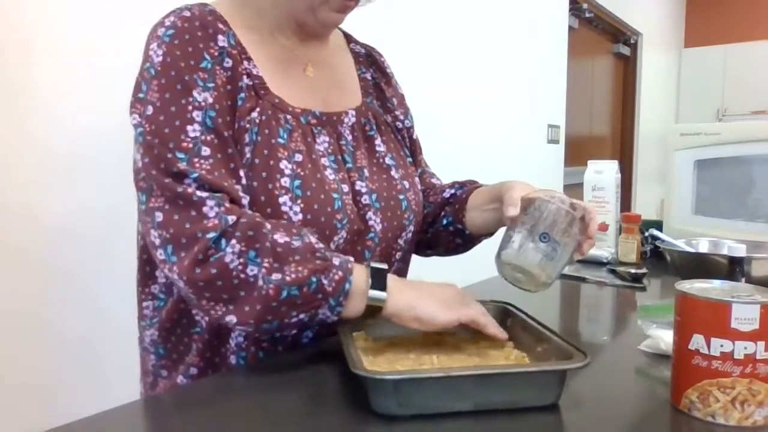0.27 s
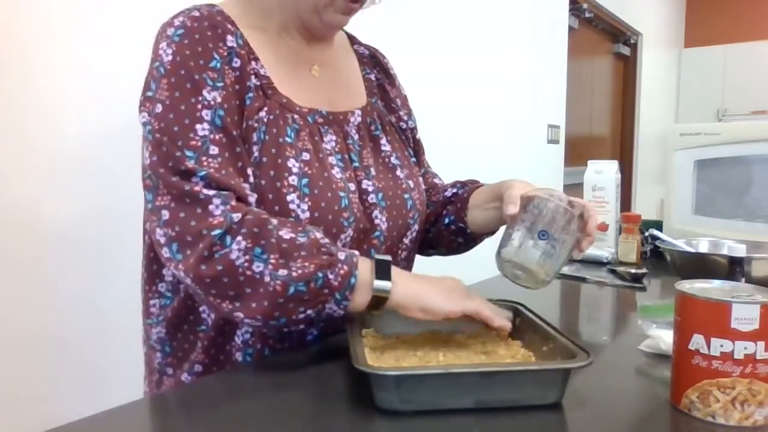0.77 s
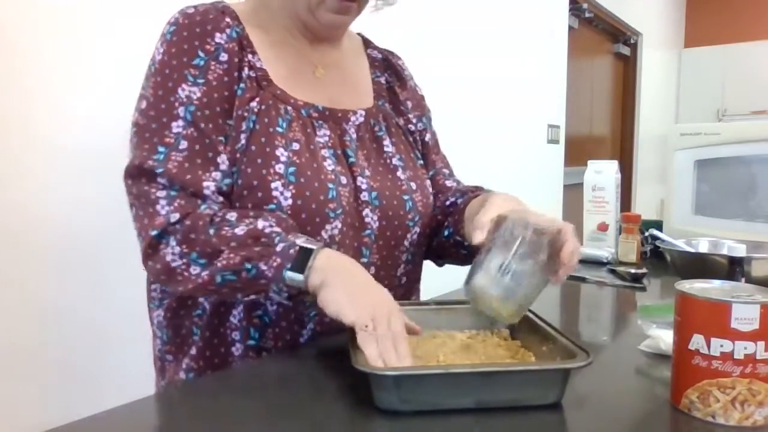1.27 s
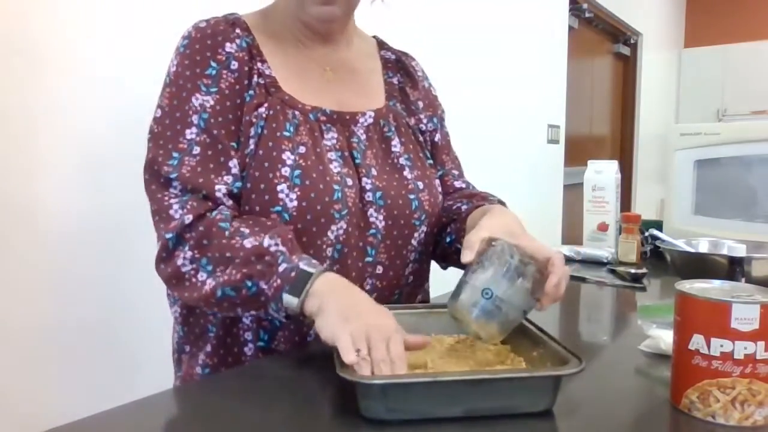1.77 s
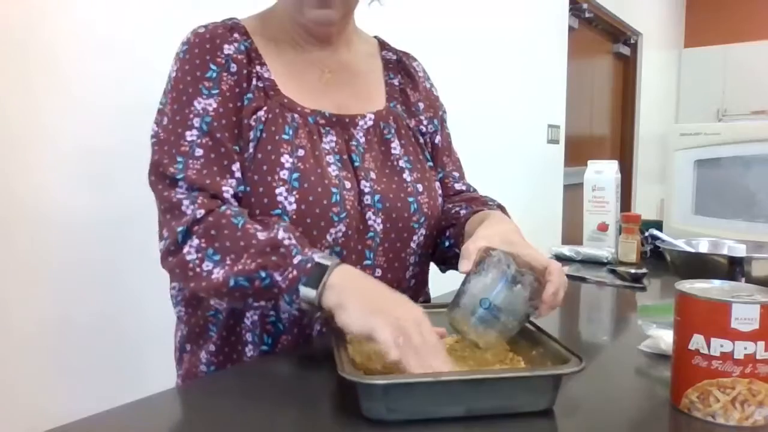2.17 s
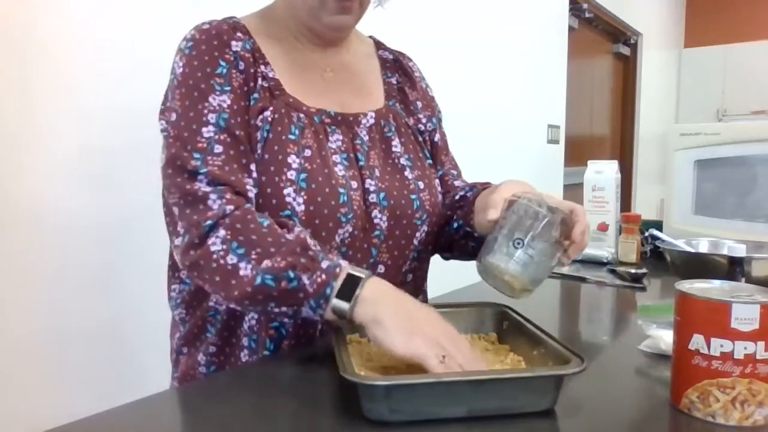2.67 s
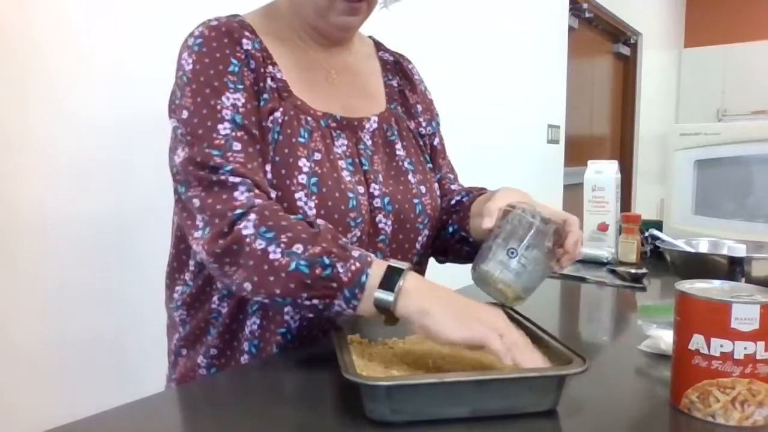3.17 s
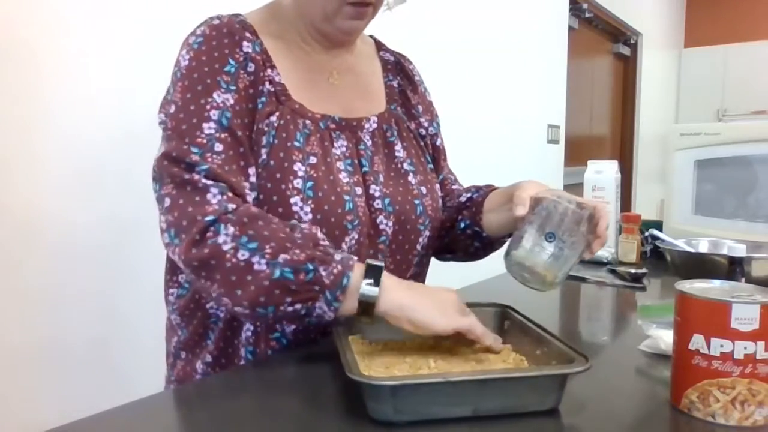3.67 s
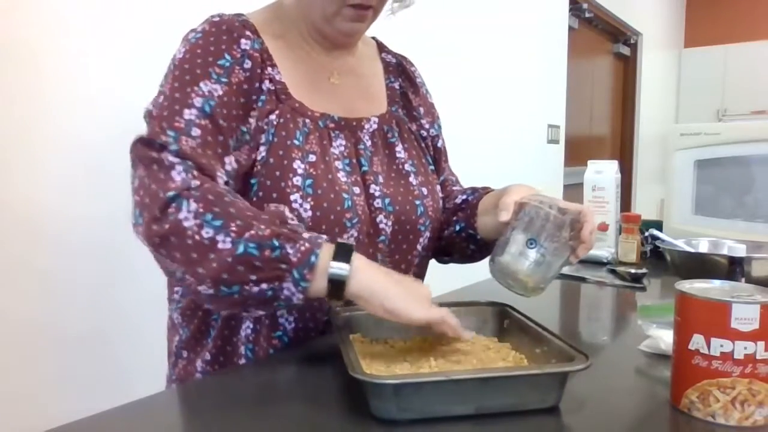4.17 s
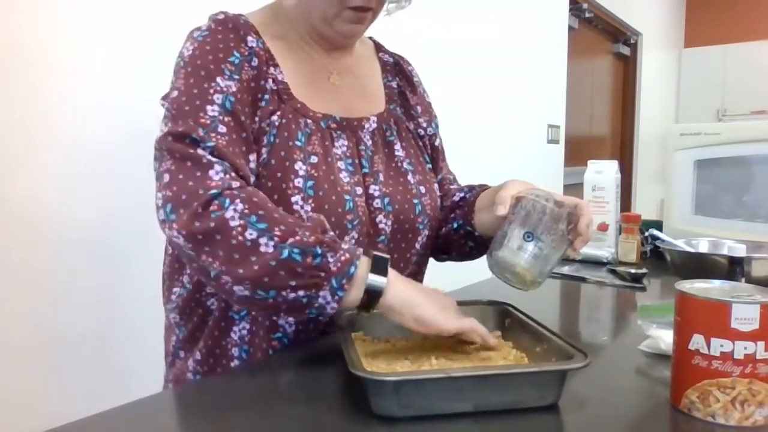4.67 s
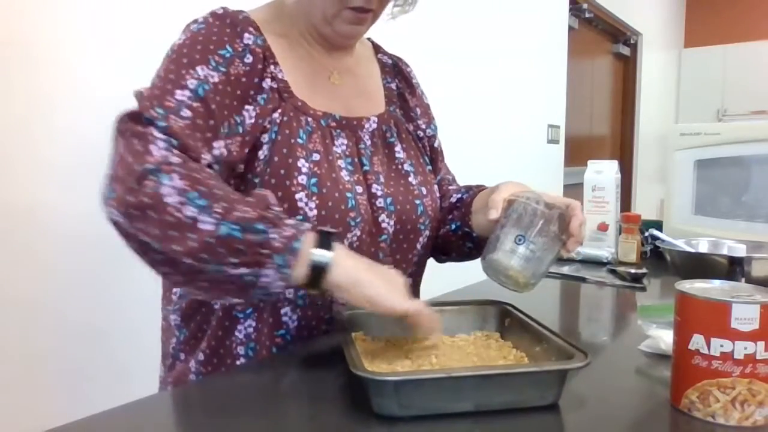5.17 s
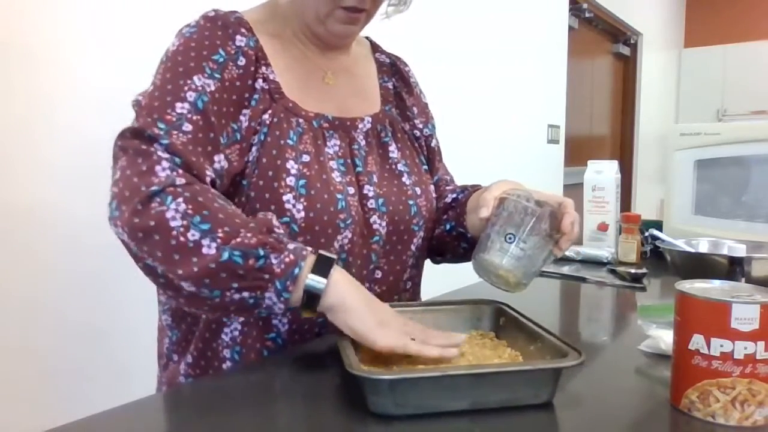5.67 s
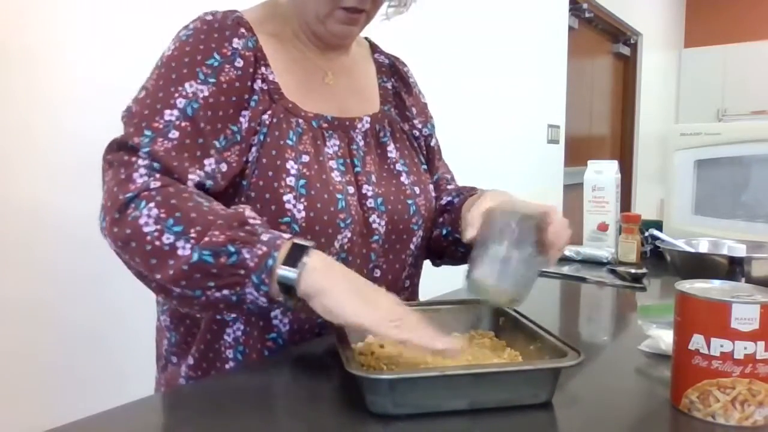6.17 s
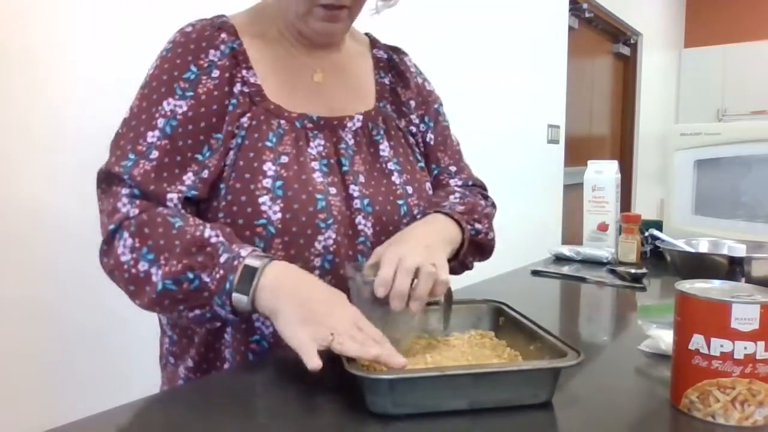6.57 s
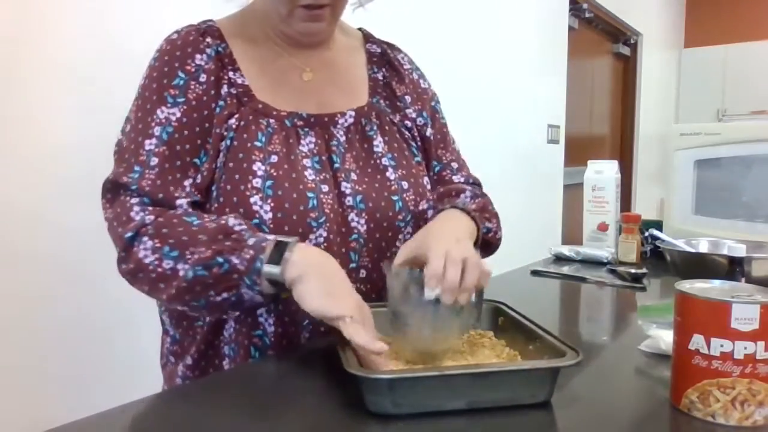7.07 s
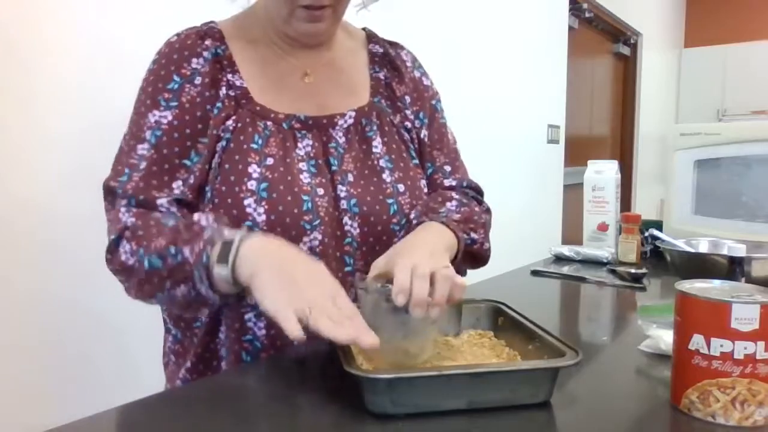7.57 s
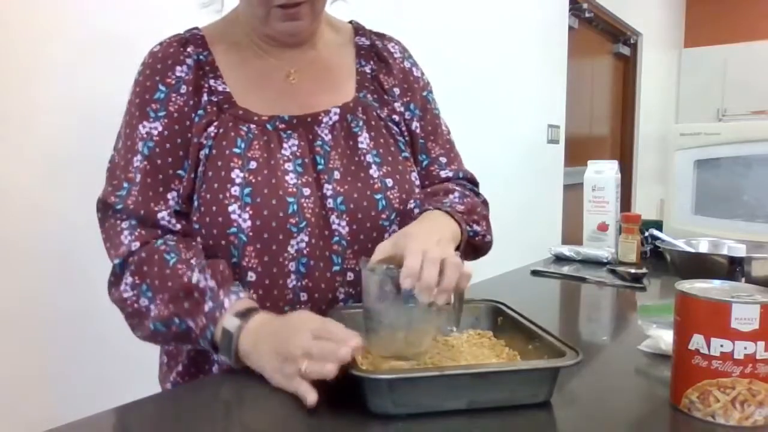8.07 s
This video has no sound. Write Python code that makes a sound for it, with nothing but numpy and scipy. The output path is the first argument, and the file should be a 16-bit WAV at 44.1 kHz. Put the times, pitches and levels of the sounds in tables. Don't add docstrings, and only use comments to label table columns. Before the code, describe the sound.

A hand pats and smooths crumbs in a metal baking pan, with soft crunchy rustles, one hard rim knock and small taps.

```python
import sys
import numpy as np
from scipy import signal
from scipy.io import wavfile
from scipy.ndimage import uniform_filter1d

SR = 44100
rng = np.random.default_rng(int(sys.argv[2]) if len(sys.argv) > 2 else 0)


def natural_amplitude(level_db):
    exponent = np.asarray(level_db, float) / 20
    return 10 ** exponent


def transcribe(signal):
    frames = np.atleast_2d(signal).T
    limited = np.clip(frames, -1, 1)
    pcm = np.round(limited * 32767).astype(np.int16)
    wavfile.write(sys.argv[1], SR, pcm)


N = 366603


def rms_one(x):
    return x / np.sqrt(np.mean(x ** 2) + 1e-20)


def at_hz(points, hz):
    table_hz, values = np.array(points).T
    return np.interp(np.log(hz), np.log(table_hz), values)


def drift(rate):
    pole = np.exp(-80 * np.pi * rate / SR)
    noise = rng.standard_normal(N // 40 + 2002)
    slow = signal.lfilter([1], [1, -2 * pole, pole * pole], noise)[2000:]
    return np.interp(np.arange(N) / 40, np.arange(len(slow)), rms_one(slow))


def ring(clicks, hz, t60):
    decay = natural_amplitude(-60 / (t60 * SR))
    turn = 2 * np.pi * hz / SR
    return signal.lfilter([0, np.sin(turn)], [1, -2 * decay * np.cos(turn), decay * decay], clicks + 1e-18)


def resonate(jolts, modes):
    total = 0
    for k, (hz, width_hz, db) in enumerate(modes):
        t60 = np.log(1000) / np.pi / width_hz
        total = total + (-1) ** k * natural_amplitude(db) * rms_one(ring(jolts, hz, t60))
    return rms_one(total)


def grains(per_s, spread_db):
    sizes = natural_amplitude(spread_db * np.minimum(rng.exponential(1, N), 4)) * rng.choice([-1, 1], N)
    return rms_one(sizes * (rng.random(N) < per_s / SR))


def banded(sources, spectrum, likeness, low_hz, patchy_db, count=2):
    # (frequency [Hz], left minus right [dB])
    port_balance = [(200, -.5), (4400, -0.5), (8000, 0), (15000, -5.5)]
    out = 0
    edges = low_hz * 2 ** np.arange(0, np.log2(19000 / low_hz), 1 / count)
    for k, (low, high) in enumerate(zip(edges, edges[1:])):
        band = signal.butter(2, [low, high], "band", fs=SR, output="sos")
        mid, side = signal.sosfilt(band, sources[k % 2])
        hz = np.sqrt(low * high)
        alike = np.clip(at_hz(likeness, hz), -1, 1)
        gain = natural_amplitude(at_hz(spectrum, hz) + patchy_db * drift(14))
        ports = natural_amplitude(at_hz(port_balance, hz) * np.array([[.5], [-.5]]))
        out = out + gain * ports * (np.sqrt(1 + alike) * mid + np.sqrt(1 - alike) * side * [[1], [-1]])
    return rms_one(out)


def swell(starts, holds, levels_db, slopes):
    rise, fall = slopes
    power = np.zeros(N)
    for s, hold, db in zip(starts, holds, levels_db):
        at = np.arange(max(0, round((s - .2) * SR)), min(N, round((s + hold + .3) * SR)))
        t = at / SR - s
        level_db = db - rise * np.maximum(-t, 0) - fall * np.maximum(t - hold, 0)
        power[at] += natural_amplitude(level_db) ** 2
    return uniform_filter1d(np.sqrt(power), size=129)


def hand(order):
    # (time [s], hold [s], crumb hiss [dB], pan shake [dB], fine dust [dB])
    sweeps = np.transpose([(0.0, 0.0087, -63, -48, -52), (0.213, 0.2, -85, -55.5, -64),
                           (0.35, 0.044, -57.5, -55, -43.5), (0.617, 0.045, -58.5, -50, -47),
                           (1.445, .085, -66.5, -47, -56), (1.539, 0.049, -66, -47.5, -47.5),
                           (1.628, 0.019, -75, -41.5, -64.5), (1.667, 0.056, -63.5, -39.5, -63),
                           (1.762, 0.027, -59, -39.5, -54), (2.072, 0.023, -65.5, -61, -52),
                           (3.085, 0.026, -72.5, -66.5, -60), (3.241, 0.049, -59, -47.5, -47),
                           (3.695, 0.049, -60.5, -52.5, -44.5), (3.926, 0.012, -63, -58, -63),
                           (4.286, .03, -57.5, -44.5, -45), (4.344, 0.022, -55.5, -53, -48),
                           (4.455, .01, -71.5, -79, -60), (4.685, 0.043, -61.5, -60.5, -47),
                           (4.78, 0.0066, -68.5, -72.5, -50), (5.28, 0.034, -66.5, -49, -56.5),
                           (5.664, .01, -64, -51, -45), (5.7, 0.019, -57, -66.5, -38),
                           (5.794, 0.049, -56.5, -59.5, -41.5), (7.064, .09, -73.5, -66.5, -59.5),
                           (7.16, 0.013, -67.5, -59, -54)])
    # (time [s], crumb hiss [dB], pan shake [dB], fine dust [dB])
    dabs = np.transpose([(.168, -74, -70, -56), (.808, -70, -69, -55), (2.34, -58.5, -45.5, -45),
                         (2.714, -68, -53.5, -57.5), (3.001, -56, -61, -43), (5.445, -64, -58, -53.5),
                         (6.688, -69, -48, -81.5), (6.776, -56.5, -58, -40), (7.37, -61, -71, -43.5),
                         (7.762, -71, -61, -60), (8.102, -71, -61, -73)])
    # (time [s], crumb hiss [dB], pan shake [dB], fine dust [dB])
    pats = np.transpose([(1.539, -60, -46, -43), (2.062, -62, -45, -45), (2.161, -60, -43, -65),
                         (3.71, -65, -43, -53), (3.966, -56, -37.5, -37), (4.672, -45.5, -39.5, -27),
                         (4.957, -45.5, -39, -32), (6.546, -54.5, -31.5, -46), (7.193, -50.5, -35, -28.5),
                         (7.582, -53, -40.5, -39), (7.91, -50.5, -44.5, -39), (8.281, -50, -36, -34.5)])
    # (rise [dB per s], fall [dB per s])
    pat_slopes = [(1700, 850), (1700, 800.5), (2400, 1204)]
    sweeping = swell(sweeps[0], sweeps[1], sweeps[2 + order], (1600, 300))
    dabbing = swell(dabs[0], 0 * dabs[0], dabs[1 + order], (900, 500))
    patting = swell(pats[0], 0 * pats[0], pats[1 + order], pat_slopes[order])
    return sweeping + dabbing + patting


def air():
    # (frequency [Hz], density [dB per Hz])
    tone = [(12, -30), (20, 3), (33, -6), (154, -16), (255, -23), (293, -20), (434, -27.5), (759, -29),
            (825, -33), (1400, -36.5), (2260, -37), (3070, -35.5), (6910, -45), (9670, -47.5),
            (16000, -47.5)]
    # (frequency [Hz], left-right likeness [-1 to 1])
    tone_likeness = [(80, 0.93), (150, 0.97), (380, 0.9), (950, 0.88), (2380, -0.02), (5980, -0.71),
                     (15000, -0.041)]
    noise = rng.standard_normal((2, 2, N))
    return natural_amplitude(-49) * banded(noise, tone, tone_likeness, 18.5, patchy_db=2.25, count=3)


def crumbs():
    # (frequency [Hz], density [dB per Hz])
    crack_colour = [(590, -26), (1000, -4), (1400, -3), (1540, -11), (1810, -10), (2150, -7), (4170, -8.5),
                    (7700, -10), (8360, -7), (16000, -6.5)]
    # (frequency [Hz], left-right likeness [-1 to 1])
    crack_likeness = [(1000, 0.75), (3000, 0.52), (15000, .4)]
    fine_hz = 10500
    cracks = np.array([[grains(9000, spread_db=2.5) for side in range(2)] for deal in range(2)])
    hiss = banded(cracks, crack_colour, crack_likeness, 590, patchy_db=-2.5)
    hiss = natural_amplitude(0.52 * drift(43)) * hiss
    coarse = signal.sosfilt(signal.butter(5, fine_hz, "low", fs=SR, output="sos"), hiss)
    fine = signal.sosfilt(signal.butter(5, fine_hz, "high", fs=SR, output="sos"), hiss)
    return hand(order=0) * natural_amplitude(8.0) * coarse + hand(order=2) * natural_amplitude(-5.5) * fine


def pan_shake():
    # (frequency [Hz], width [Hz], level [dB])
    floor_modes = [(545, 190, -1.5), (662, 22, -4), (820, 59, 3.5), (1200, 110, -3), (1356, 110, -3.5),
                   (1996, 590, -10)]
    return hand(order=1) * natural_amplitude(-5.5) * resonate(grains(1500, spread_db=-2.0), floor_modes)


def pan_drag():
    # (time [s], hold [s], level [dB])
    drags = [
        (0.0, 0.016, -58.5),
        (0.173, .02, -53.5),
        (.23, 0.094, -64.5),
        (1.435, .02, -58),
        (1.47, .005, -47),
        (1.668, .005, -48.5),
        (1.784, .005, -47),
        (3.223, 0.065, -56.5),
    ]
    # (frequency [Hz], width [Hz], level [dB])
    wall_modes = [(777, 50, -0.5), (847, 41, 2), (1420, 73, -7.5), (1720, 51, -4.5), (1850, 79, -2),
                  (2450, 120, -3), (2900, 247, -6), (3990, 150, -12.5), (4800, 300, -13)]
    singing = resonate(grains(500, spread_db=2.5), wall_modes)
    return swell(*np.transpose(drags), (500, 380)) * natural_amplitude(-1.5) * singing


def taps():
    # (time [s], peak [dB], body pitch [Hz], ring t60 [s])
    palm_taps = [(0.335, -41, 630, 0.038), (0.357, -48, 680, 0.037), (2.331, -55, 444, .025),
                 (2.707, -54.5, 446, 0.067), (3.708, -40.5, 617, 0.025), (3.965, -31.5, 653, 0.023),
                 (4.292, -40.5, 550, 0.0087), (4.672, -35, 632, 0.036), (4.959, -36, 650, .035),
                 (5.321, -41.5, 546, .02), (6.538, -40.5, 673, 0.049), (6.776, -53.5, 662, 0.044)]
    # (time [s], peak [dB], body pitch [Hz], ring t60 [s])
    tip_taps = [(1.915, -30.5, 818, .08), (2.062, -41, 1200, 0.011), (2.157, -23, 638, 0.026),
                (2.993, -61, 732, .041), (3.226, -49, 810, .04), (4.358, -46, 834, 0.055),
                (5.295, -46, 830, 0.12), (6.684, -59.5, 833, .05), (7.173, -38, 1090, 0.018),
                (7.192, -29.5, 878, 0.038), (7.58, -45.5, 1200, 0.028), (7.906, -47, 1106, 0.046),
                (8.279, -30, 1045, 0.02)]
    # (time [s], peak [dB], body pitch [Hz], ring t60 [s])
    chatter = [
        (1.421, -46.5, 1709, 0.0092),
        (1.489, -48.5, 874, .05),
        (1.538, -39, 840, .027),
        (1.665, -33.5, 815, .041),
        (1.714, -41, 825, 0.015),
        (1.76, -38.5, 1420, 0.04),
        (1.778, -36.5, 830, 0.025),
        (1.823, -46.5, 820, .038),
    ]
    # (frequency [Hz], level [dB], ring t60 [s])
    floor_notes = [(700, -16, 0.038), (956, -20.5, 0.017), (1127, -10, 0.036), (1480, -16, 0.022)]
    kinds = [(palm_taps, (2850, -21, 0.83)), (tip_taps, (2250, -18.5, 0)), (chatter, (2300, -9, 0))]
    out, length = np.zeros(N), round(.25 * SR)
    t = np.arange(length) / SR
    events = sorted(row + wall for rows, wall in kinds for row in rows)
    for s, db, hz, t60, wall_hz, wall_db, sag in events:
        start = round(s * SR)
        touches = [0, round(SR / hz), round(.004 * SR), round(.009 * SR)]
        contact = np.zeros(length)
        contact[touches] = [0.82, 1.0, 0.29, 0.18] * rng.uniform(0.75, 2.41, 4)
        note = ring(contact, hz, max(t60, .005))
        for floor_hz, floor_db, floor_t60 in floor_notes:
            note -= natural_amplitude(floor_db + rng.normal(0, 1)) * ring(contact, floor_hz, floor_t60)
        wall = natural_amplitude(wall_db + 5) * ring(contact, wall_hz, 0.01)
        crust = rng.standard_normal(length)
        note += sag * natural_amplitude(-21) * ring(crust * natural_amplitude(-60 * t / 0.15), 545, 0.05)
        dull = signal.butter(2, [0.37 * hz, 2.1 * hz], "band", fs=SR, output="sos")
        scuff = signal.sosfilt(dull, crust * natural_amplitude(1.5 - 60 * t / 0.087))
        out[start:start + length] += (natural_amplitude(db - 2.5) * (note + wall + scuff))[:N - start]
    return out


def knock():
    # (time [s], level of thud and clatter [dB])
    blows = [
        (1.607, -4.5),
    ]
    # (frequency [Hz], level [dB], ring t60 [s])
    rim_notes = [(550, -12.5, 0.026), (704, -17, 0.034), (830, -1.5, 0.037), (947, -7.5, .016),
                 (1197, -9.5, 0.027), (1480, -15.5, 0.0053), (2300, -24, 0.034), (2630, -16, 0.012),
                 (3300, -20, 0.015), (4000, -19.5, 0.019), (4500, -23.5, 0.012), (5940, -31.5, .008)]
    (s, db), = blows
    start, length = round((s + 0.0015) * SR), round(.1 * SR)
    t = np.arange(length) / SR
    contact = np.zeros(N)
    rattle = rng.standard_normal(length) * (rng.random(length) < 1200 / SR)
    contact[start:start + length] = .12 * rattle * natural_amplitude(-60 * t / 0.044)
    for delay_s, strength in [(0, -.1), (.0005, .5), (.0011, -.3), (.0029, -.3)]:
        contact[start + round(delay_s * SR)] = strength
    contact = signal.lfilter(*signal.butter(1, 5000, fs=SR), contact)
    rim = sum(natural_amplitude(m) * ring(contact, hz, t60) for hz, m, t60 in rim_notes)
    rim = signal.sosfilt(signal.butter(4, 470, "high", fs=SR, output="sos"), rim)
    push = np.abs(contact)
    thud = natural_amplitude(-24.5) * (ring(push, 150, 0.11) + ring(push, 235, 0.1))
    clatter = np.zeros(N)
    clatter[start:start + length] = rng.standard_normal(length) * natural_amplitude(-28 - 60 * t / .06)
    clatter = signal.sosfilt(signal.butter(2, [1200, 6000], "band", fs=SR, output="sos"), clatter)
    blow = .74 * rim / np.abs(rim).max()
    return blow + natural_amplitude(db) * (thud + clatter)


def glass():
    # (time [s], ring [dB], thud over ring [dB])
    glass_taps = [
        (1.9161, -43.5, 13),
        (2.1587, -31, -2),
    ]
    # (frequency [Hz], level [dB], ring t60 [s])
    glass_notes = [(2490, -1, 0.032), (2530, -15, 0.093), (2596, -14.5, 0.15), (3630, -15, 0.02),
                   (4630, -8.5, 0.015), (5100, -13, 0.012)]
    clink, push = np.zeros((2, N))
    for s, ring_db, thud_db in glass_taps:
        at = round(s * SR)
        clink[at] = natural_amplitude(ring_db)
        push[at] = natural_amplitude(ring_db + thud_db)
    wall = sum(natural_amplitude(m) * ring(clink, hz, t60) for hz, m, t60 in glass_notes)
    return wall + 1.0 * ring(push, 346, 0.024) - 0.53 * ring(push, 518, 0.1)


def kitchen(x):
    t60_s, wall_cut_hz = 0.43, 1900
    t = np.arange(round(.5 * SR)) / SR
    tail = rng.standard_normal((2, len(t))) * natural_amplitude(-60 * t / t60_s) * (t > .006)
    mid, side = signal.lfilter(*signal.butter(1, wall_cut_hz, fs=SR), tail)
    side = signal.lfilter(*signal.butter(1, 2500, "high", fs=SR), side)
    tail = mid + side * [[1.2], [-1.2]]
    tail = tail / np.sqrt(np.sum(tail ** 2) / 2)
    return signal.oaconvolve(x[None], tail, axes=1)[:, :N]


def scene():
    pan = pan_shake() + pan_drag() + taps() + knock() + glass()
    close = pan * natural_amplitude([[-.2], [.2]])
    return air() + crumbs() + close + natural_amplitude(-28) * kitchen(pan)


def starve(x):
    band_filter = signal.ellip(6, .05, 40, (8100, 9650), "band", fs=SR, output="sos")
    band = signal.sosfiltfilt(band_filter, x.mean(0))
    level_db = 10 * np.log10(uniform_filter1d(band ** 2, size=2600) + 1e-20)
    faint = level_db < np.percentile(level_db, 31)
    return x - band * uniform_filter1d(faint * 1., size=400)


def band_limit(x):
    return signal.sosfilt(signal.butter(12, 16820, fs=SR, output="sos"), x)


def record(dry):
    cut = signal.sosfilt(signal.ellip(12, .3, 70, 15900, fs=SR, output="sos"), dry)
    return band_limit(starve(cut))


dry = scene()
out = record(dry)
transcribe(out)
```